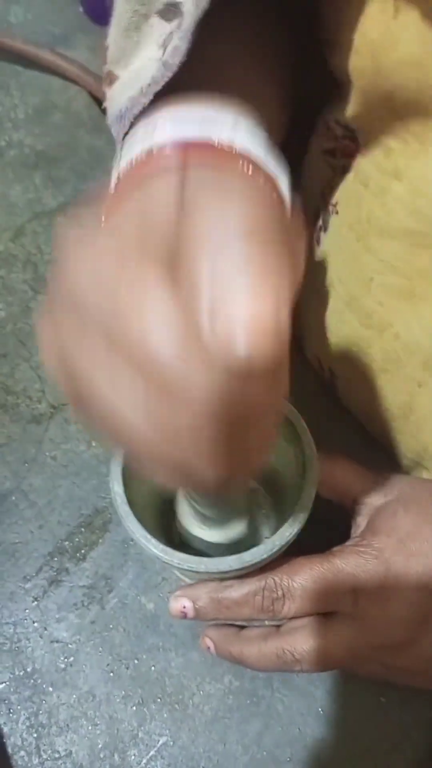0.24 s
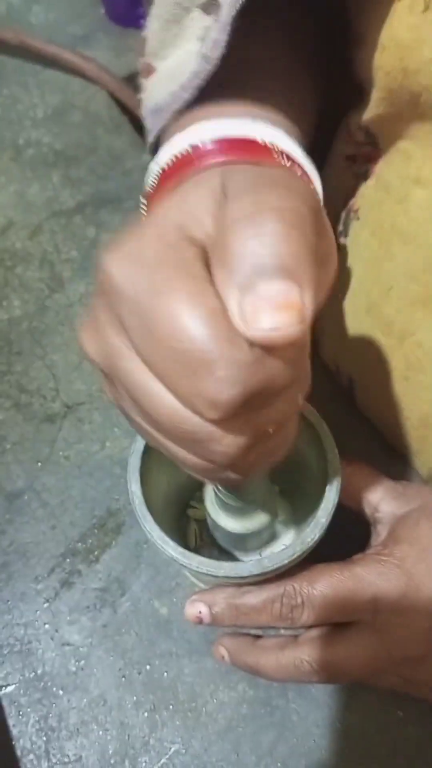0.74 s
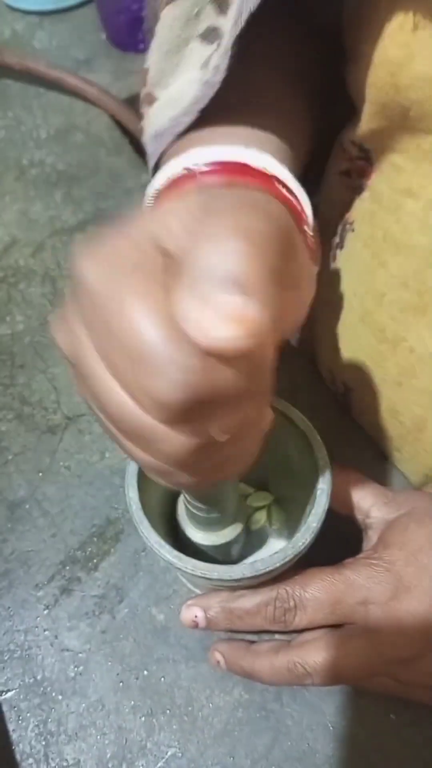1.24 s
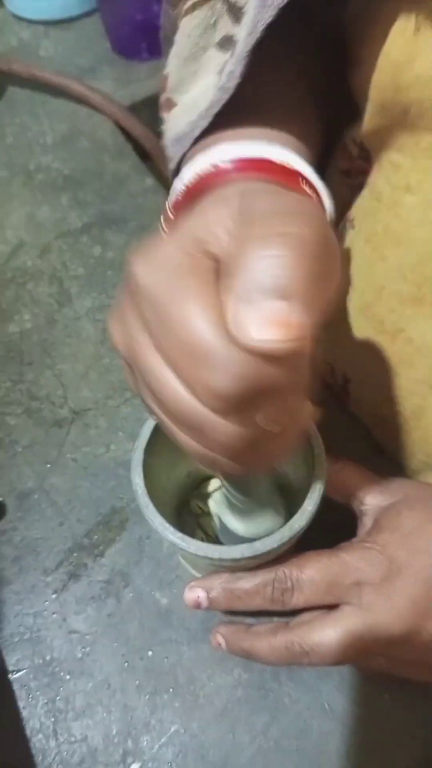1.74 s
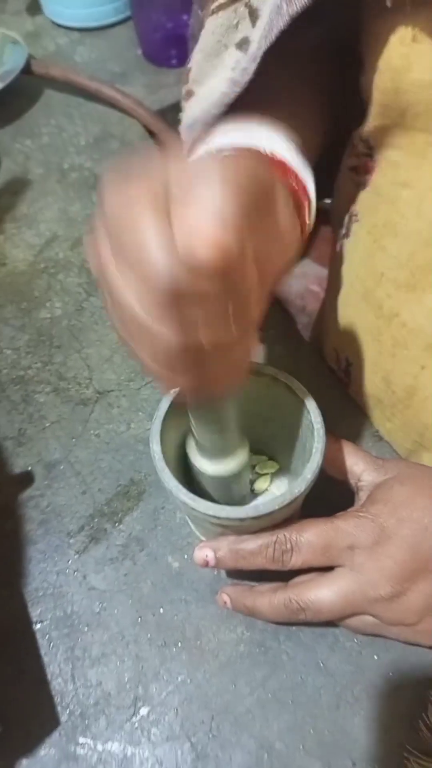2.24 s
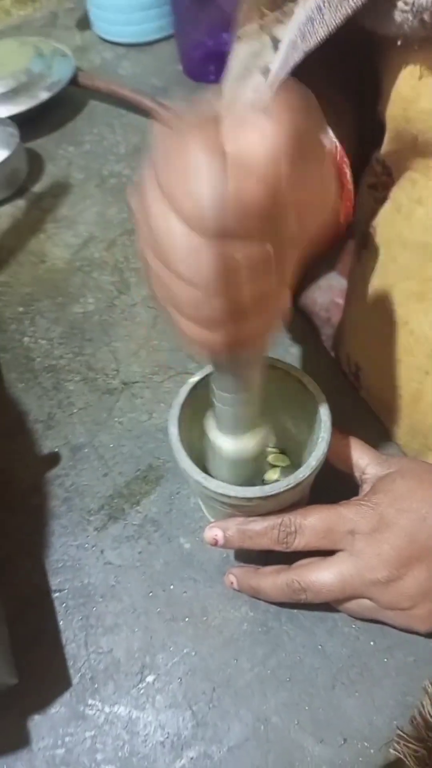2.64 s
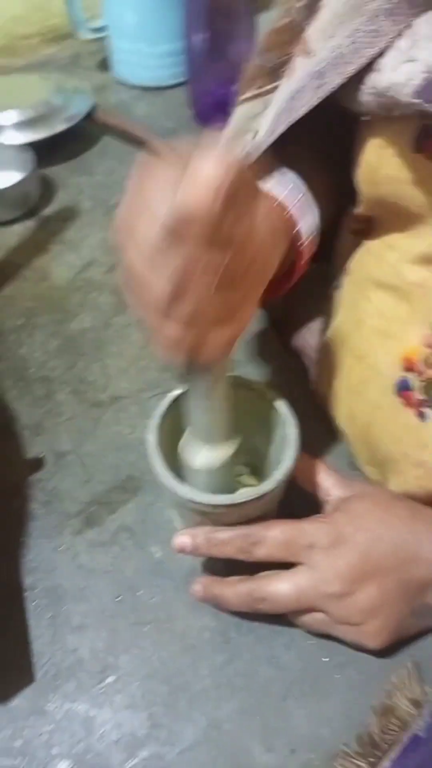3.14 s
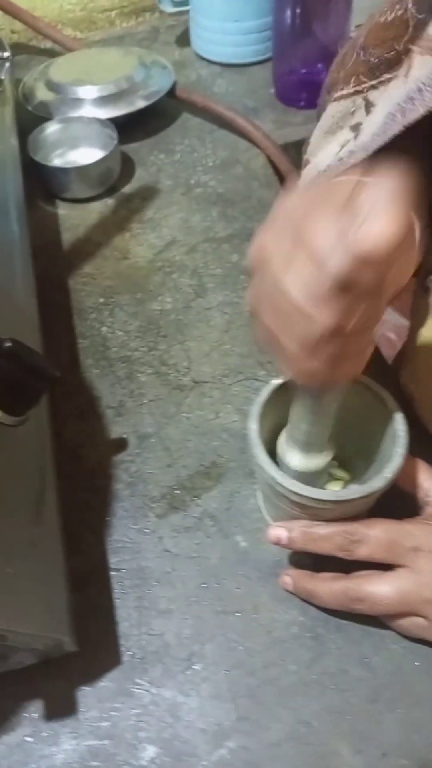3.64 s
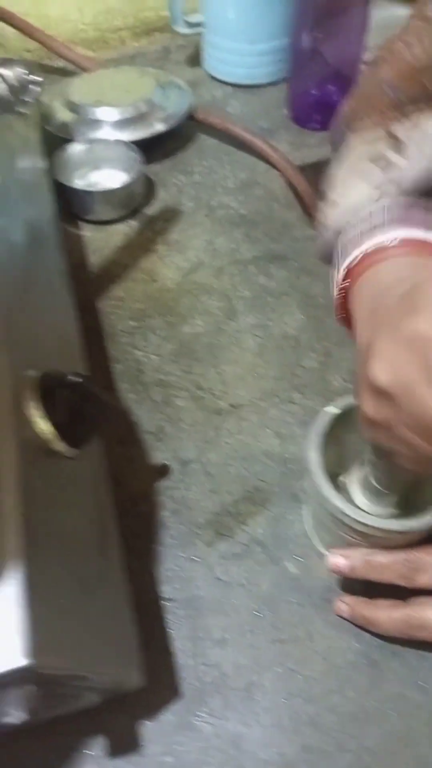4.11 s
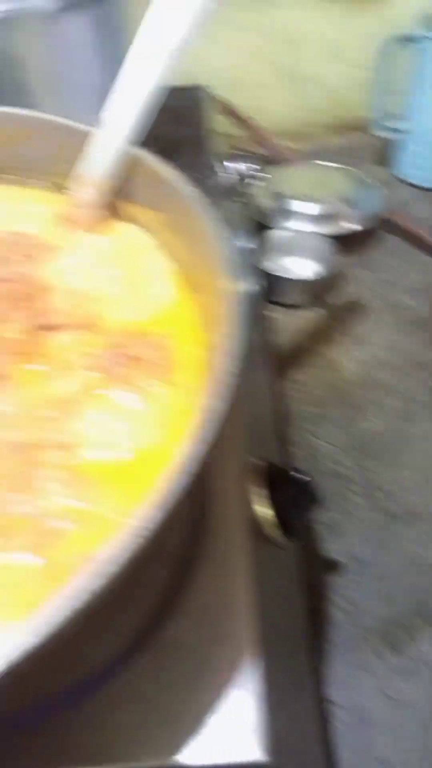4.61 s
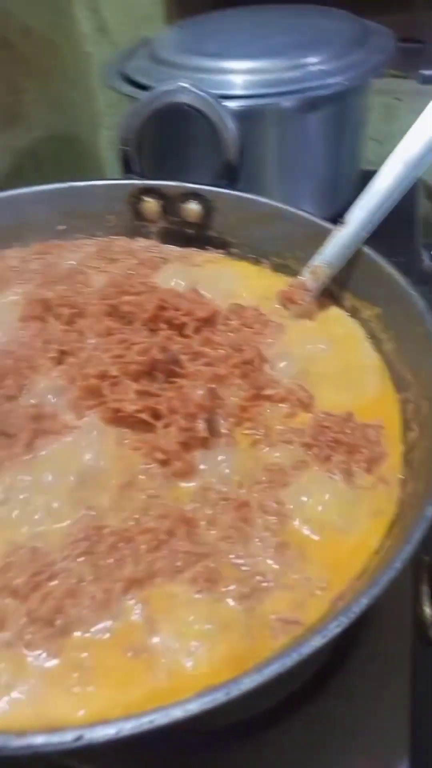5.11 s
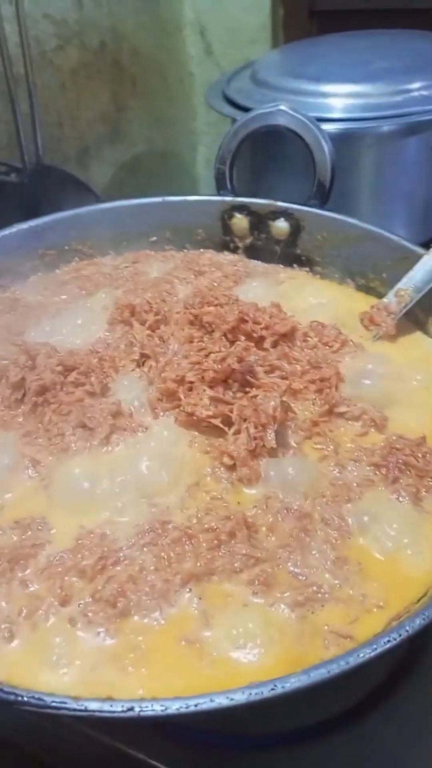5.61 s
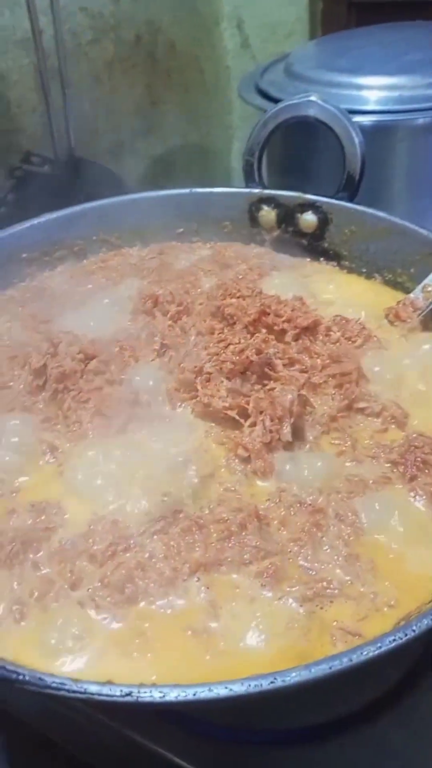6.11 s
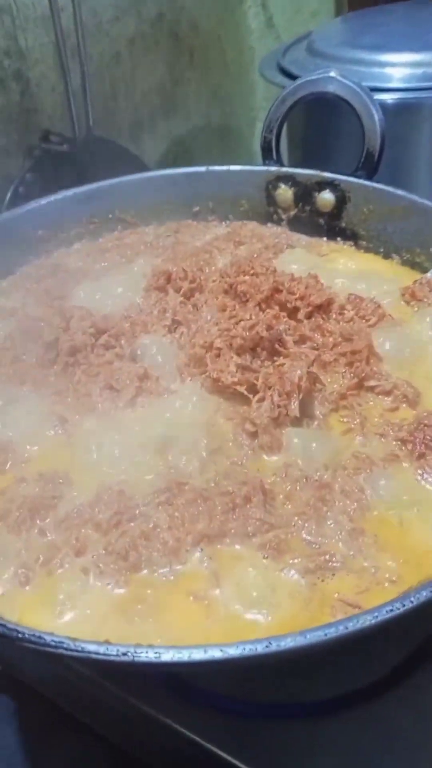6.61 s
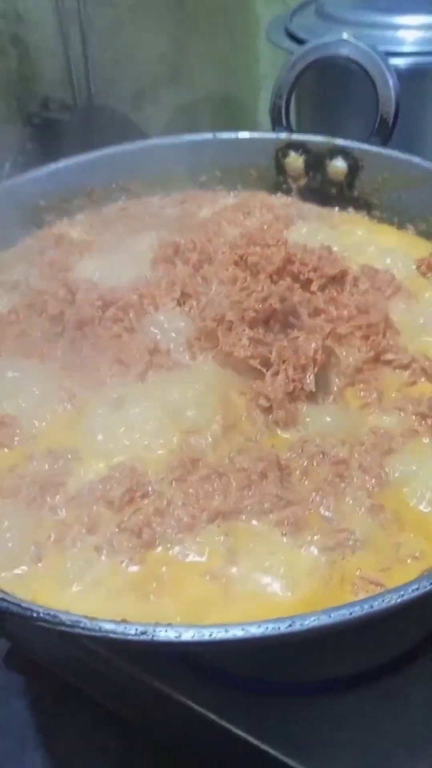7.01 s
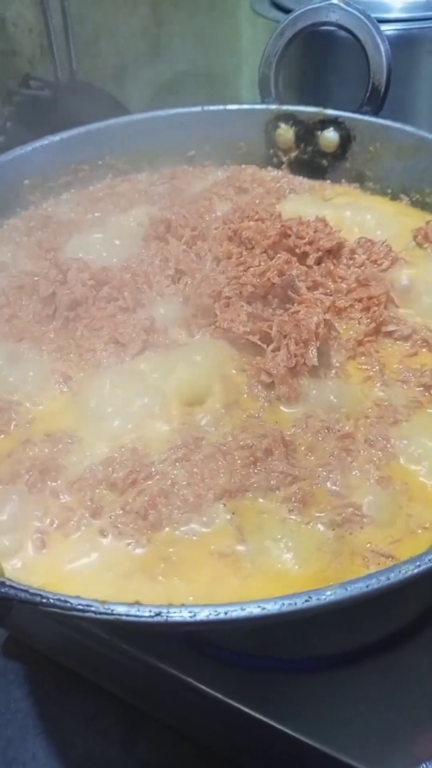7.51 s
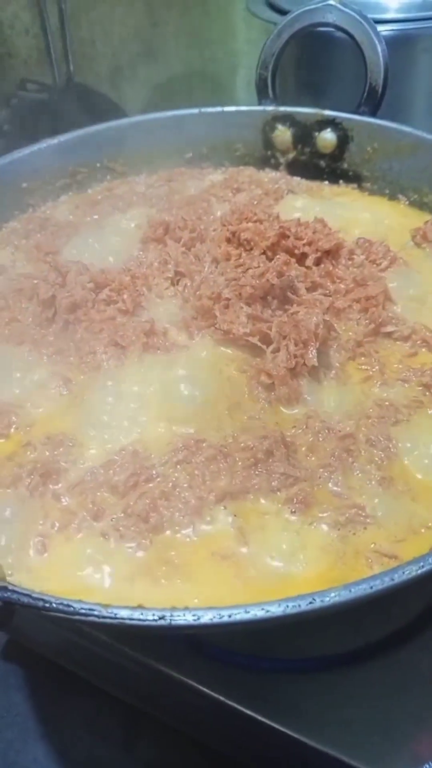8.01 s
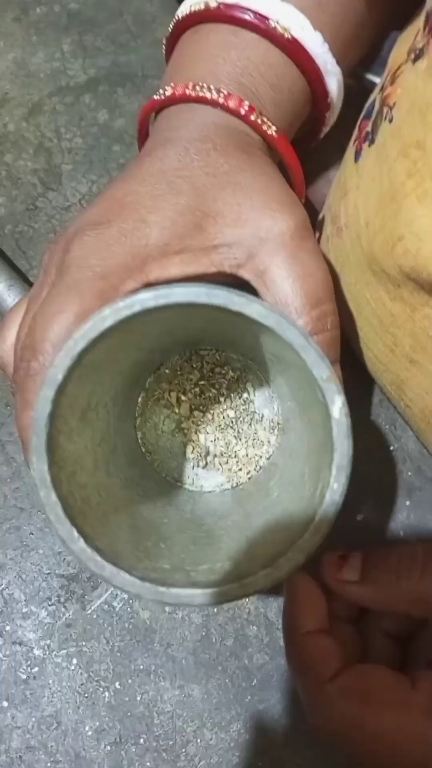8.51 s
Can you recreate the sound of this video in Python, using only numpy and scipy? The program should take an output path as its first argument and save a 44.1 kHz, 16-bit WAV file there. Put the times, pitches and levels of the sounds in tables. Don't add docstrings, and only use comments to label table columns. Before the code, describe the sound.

Steady sharp metallic pounding in a mortar on a stone counter, about four blows a second, with clinks, bangle ticks and faint hiss.

```python
import sys
import numpy as np
from scipy import signal
from scipy.io import wavfile
from scipy.ndimage import uniform_filter1d

SR = 44100
rng = np.random.default_rng(int(sys.argv[2]) if len(sys.argv) > 2 else 0)


def to_linear_factor(level_db):
    exponent = np.asarray(level_db, float) / 20
    return 10 ** exponent


def wrap_up_sound(samples):
    columns = np.atleast_2d(samples).T
    tamed = np.clip(columns, -1, 1)
    steps = np.round(tamed * 32767).astype(np.int16)
    wavfile.write(sys.argv[1], SR, steps)


N = 385875

# start in seconds, crack in dB, wall ring in dB, cup ring in dB.
BLOWS = [(0.0004, -21, -38, -27.5), (0.2649, -9.5, -26, -26), (0.5398, -13, -32.5, -26),
         (0.8032, -6.5, -23.5, -27.5), (1.063, -7.5, -22.5, -28.5), (1.3106, -12.5, -32, -27),
         (1.5684, -15, -40.5, -35.5), (1.8132, -12, -38, -28), (2.0627, -47.5, -72, -67),
         (2.3146, -9.5, -16.5, -28.5), (2.586, -6.5, -21.5, -33), (2.86, -6.5, -18, -38.5),
         (3.1308, -18.5, -62, -30.5), (3.4097, -7, -26.5, -33.5), (3.689, -8, -24, -36.5),
         (3.9619, -7.5, -25, -32), (4.2411, -8, -27.5, -31), (4.518, -21.5, -58, -29.5),
         (4.7912, -14.5, -49, -27.5), (5.0903, -8, -38.5, -28), (5.3842, -20.5, -41, -60),
         (5.6738, -8.5, -38.5, -31.5), (5.9649, -5.5, -32.5, -29), (6.2528, -3.5, -29, -34),
         (6.5346, -2.5, -32.5, -29), (6.8267, -0.5, -41, -21), (7.1035, -8.5, -56, -35),
         (7.5907, -13.5, -41, -23), (7.9542, -2, -21, -26.5), (8.318, -6, -30, -30.5)]
# pitch in Hz, gap between its two halves in Hz, time to fall 60 dB in seconds.
WALL_MODES = [(2773.5, 7.84, 0.31), (7245, 70, 0.27), (9880, 32, 0.15), (12000, 28, 0.11)]


def evened(x):
    return x / np.sqrt(np.mean(x ** 2) + 1e-20)


def read(points, hz):
    f, value = np.transpose(points)
    return np.interp(np.log(hz + 1), np.log(f + 1), value)


def add(mix, s, sound):
    part = mix[max(round(s * SR), 0):][:len(sound)]
    part += sound[:len(part)]


def coloured(x, points):
    gain_db = read(points, abs(np.fft.fftfreq(4096, 1 / SR)))
    log_gain = np.log(to_linear_factor(np.maximum(gain_db, -100)))
    spectrum = np.exp(np.conj(signal.hilbert(log_gain)))
    taps = np.fft.ifft(spectrum).real[:2048]
    return signal.oaconvolve(x, taps / np.linalg.norm(taps))[:len(x)]


def mode(hz, db, t60, rise_s, turn=0):
    t = np.arange(SR // 2) / SR
    return to_linear_factor(db - 60 * t / t60) * (1 - np.exp(-t / rise_s)) * np.sin(2 * np.pi * (hz * t + turn))


def pair(hz, split_hz, t60, db, luck):
    lower = mode(hz - split_hz / 2, db, t60, rise_s=0.00051)
    upper = mode(hz + split_hz / 2, db, t60, rise_s=0.00024, turn=luck[1])
    return lower + 0.53 * luck[0] * upper


def burst(db, t60, lead_s, grit_db):
    t = np.arange(4096) / SR - lead_s
    grain_db = grit_db * rng.standard_normal(4096 // 16).repeat(16)
    grit = rng.standard_normal(4096) * to_linear_factor(grain_db)
    return to_linear_factor(db + np.where(t < 0, 30 * t / lead_s - 14, -60 * t / t60)) * grit


def blows():
    # pitch in Hz, level in dB per Hz.
    crack_colour = [(290, -23.5), (500, 0.5), (2750, -0.5), (3220, -8.5), (4050, -11), (5680, -10),
                    (6570, -17.5), (8070, -34.5), (9000, -25.5), (11700, -50), (19800, -120)]
    # pitch in Hz, level in dB per Hz.
    husk_colour = [(3500, -16.5), (5300, 0.5), (7800, -4.5), (10300, -2), (12600, -17.5), (15300, -6),
                   (16300, -21.5)]
    # time in seconds, crunch in dB.
    pods = [(0, -49.5), (.8, -38.5), (1.55, -44.5), (2.5, -37), (3.7, -42), (4.55, -36.5), (5.4, -45.5),
            (6.5, -41), (6.85, -32.5), (7.1, -46.5), (7.6, -31.5), (8.3, -41)]
    # pitch in Hz, gap between its two halves in Hz, time to fall 60 dB in seconds.
    cup = (976, 22, 0.069)
    same_crack = .8
    crack, husk, ring = np.zeros((3, N))
    usual = burst(-6.0, 0.0075, lead_s=0.001698, grit_db=0.97)
    for (s, crack_db, wall_db, cup_db), luck in zip(BLOWS, rng.random((len(BLOWS), 5))):
        fresh = np.sqrt(1 - same_crack ** 2) * burst(-5.5, 0.0075, lead_s=0.0017, grit_db=1.3)
        add(crack, s - .001, to_linear_factor(crack_db) * (same_crack * usual + fresh))
        contact = mode(1900 + 700 * luck[4], crack_db - 16.5, 0.0052, rise_s=0.00015)
        add(crack, s + 0.001027, contact)
        husk_db = np.interp(s, *np.transpose(pods))
        add(husk, s - .003, burst(husk_db + 6.0, 0.017, lead_s=0.0032, grit_db=3.9))
        wall_ring = pair(*WALL_MODES[0], wall_db - .1, luck[:2])
        cup_ring = pair(*cup, cup_db + 6.5, luck[2:])
        add(ring, s + 0.001006, wall_ring + cup_ring)
    return coloured(crack, crack_colour) + coloured(husk, husk_colour), ring


def slab_boom():
    # pitch in Hz, level in dB, time to fall 60 dB in seconds.
    slab_modes = [(85.2, -9, 1.), (94.9, -16, 1.), (97.05, -7, 1.), (116, -11.5, 0.69), (163, -11, 0.45),
                  (194.3, -14, 1), (217.9, -3.5, 0.42), (225.5, -5.5, 0.74), (238.1, -5, 0.5),
                  (263.5, -11, 0.73), (299.7, 3.5, 0.34), (315.2, -5, 0.32), (325.4, -14.5, 0.99),
                  (344, 7.5, 0.12), (349.84, -0.5, 0.63), (359, -5.5, 0.43), (380.2, 3.5, 0.38),
                  (405.6, 1, 0.4), (414.8, -6, 0.34), (433.7, -4, 0.29), (458.7, -15, 0.76),
                  (493.4, -28, 0.9), (508.5, 2.5, 0.29), (518.7, -9.5, 0.49), (550.6, -3, 0.12),
                  (605, -27.5, 0.38), (637, -24, 0.28), (689, -13.5, 0.37)]
    # time in seconds, boom of a full crack in dB.
    weight = [(0, -26), (1.2, -27), (2.4, -28.5), (3.2, -26), (4.3, -26), (5.35, -27), (5.7, -24),
              (6.6, -27.5), (6.85, -33.5), (7.3, -23), (8.4, -26)]
    # time in seconds, middle boom in dB, upper boom in dB.
    stance = [(0, -0.5, 0), (1.5, 0, 0.5), (2.3, -1.5, -1.5), (3.5, 1.5, -4.5), (4.2, 1, -3),
              (4.6, -4.5, 0.5), (5.7, -2, 2.5), (6.4, 0.5, 0), (6.85, -2, 7), (7.1, 2.5, 1.5),
              (7.6, -0.5, 1.5), (8.4, 0.5, 2.5)]
    deep_hz, middle_hz, upper_hz = 130, 335, 470
    boom_per_crack = 0.29
    deep_per_crack, deep_db = 0.16, -1
    modes = np.array([(-1) ** k * mode(*row, rise_s=0.0046) for k, row in enumerate(slab_modes)])
    modes /= abs(modes.sum(0)).max()
    group = np.digitize(np.array(slab_modes)[:, 0], [deep_hz, middle_hz, upper_hz])
    deep, low, middle, upper = (modes[group == k].sum(0) for k in range(4))
    stance_s, middle_db, upper_db = np.transpose(stance)
    boom = np.zeros(N)
    for s, crack_db, _, _ in BLOWS:
        boom_db = np.interp(s, *np.transpose(weight)) + 8
        slab = low + to_linear_factor(np.interp(s, stance_s, middle_db)) * middle
        slab = slab + to_linear_factor(np.interp(s, stance_s, upper_db)) * upper
        add(boom, s, to_linear_factor(boom_db + boom_per_crack * crack_db) * slab)
        add(boom, s, to_linear_factor(boom_db + deep_db + deep_per_crack * crack_db) * deep)
    return boom


def rattle(clank):
    # start in seconds, length in seconds, level in dB.
    rocking = (6.835, .095, -30)
    start_s, length_s, db = rocking
    rock = np.arange(0, length_s, 1 / SR) / length_s
    knocks = evened(rng.standard_normal(SR // 4) ** 3)[:len(rock)]
    add(clank, start_s, to_linear_factor(db) * np.sin(np.pi * rock ** 1.2) * knocks)


def clinks():
    # start in seconds, tick in dB, then ring of the first, second and third wall tones in dB.
    wall_taps = [(0.2445, -22.5, -37.5, -64, -53), (0.622, -22.5, -68, -76, -80),
                 (1.5359, -9.5, -14, -55.5, -42), (1.701, -14, -26, -57, -40.5),
                 (2.2991, -13, -20.5, -44, -34.5), (2.588, -41.5, -28.5, -48.5, -41.5),
                 (5.3664, -24, -45, -56.5, -64), (6.6296, -26.5, -42.5, -52, -63.5),
                 (6.8238, -13, -28.5, -35.5, -45), (6.8423, -13.5, -32.5, -39, -48),
                 (6.861, -23.5, -38.5, -44, -56.5), (6.8844, -20.5, -27, -41, -53),
                 (7.4151, -14, -26, -43, -45.5), (7.4355, -37, -32.5, -40, -54.5)]
    # pitch in Hz, level in dB per Hz.
    clank_colour = [(500, -13.5), (1500, -2.5), (3200, 5.5), (4200, -10), (5200, -4.5), (9000, -32),
                    (15000, -30)]
    # pitch in Hz, level in dB, time to fall 60 dB in seconds.
    overtone = (12000, -9, .12)
    over_hz, over_db, over_t60 = overtone
    clank, ring = np.zeros((2, N))
    for (s, tick_db, *ring_db), luck in zip(wall_taps, rng.random((len(wall_taps), 4, 2))):
        ring_db.append(ring_db[-1] - 8)
        add(clank, s - .001, burst(tick_db - 5, 0.0065, lead_s=0.00089, grit_db=2.8))
        for wall_mode, db, share in zip(WALL_MODES, ring_db, luck):
            add(ring, s, pair(*wall_mode, db + 2.0, share))
        add(ring, s, mode(over_hz, over_db + ring_db[3], over_t60, rise_s=.0006))
    rattle(clank)
    return coloured(clank, clank_colour), ring


def scrapes(width_hz):
    # start in seconds, level in dB, pitch in Hz.
    drags = [(0.2109, -46.5, 1454), (0.659, -41.5, 2360), (1.457, -54.5, 2260), (1.789, -37, 2720),
             (1.965, -38.5, 2100), (2.1535, -50.5, 1700), (2.493, -40.5, 2760), (2.7794, -51, 2760),
             (3.097, -58.5, 2770), (3.322, -61, 1350), (3.3583, -51, 1480), (4.13, -46, 2040),
             (4.463, -43, 1610), (5.0295, -53.5, 3130), (5.545, -51, 2160), (5.865, -48, 1940),
             (6.17, -45, 3150)]
    length_s = .05
    out = np.zeros(N)
    t = np.arange(8192) / SR
    swell = np.sin(np.pi * np.minimum(t / length_s, 1))
    for (s, db, hz), slips in zip(drags, rng.standard_normal((len(drags), 8192))):
        rub = evened(signal.lfilter(*signal.iirpeak(hz, hz / width_hz, SR), slips ** 3))
        add(out, s, to_linear_factor(db - 14) * rub * swell)
    return out


def bangles():
    # start in seconds, level in dB, brightness in dB.
    touches = [(0.1226, -56, -25), (0.4673, -39, -13.5), (1.2048, -34.5, -40), (1.3912, -44.5, -39),
               (1.9914, -73, -25), (2.4638, -46, -28), (4.375, -57.5, -23), (4.5446, -34.5, -6),
               (4.9082, -43.5, -6.5), (4.999, -47, -14), (5.0716, -44, -13), (5.2084, -41, -21.5),
               (5.314, -44.5, -10.5), (5.426, -45, -15), (6.494, -52.5, 12), (7.8002, -43, -11),
               (8.1549, -36, -2.5), (8.516, -45, -16)]
    # pitch in Hz, level in dB, time to fall 60 dB in seconds.
    bangle_modes = [(6400, -4, 0.035), (10000, 3, 0.033), (10700, -5.5, 0.025), (14400, -10.5, 0.03),
                    (15450, -5.5, .03)]
    out = np.zeros(N)
    draws = rng.standard_normal((len(touches), len(bangle_modes), 2))
    for (s, db, bright_db), luck in zip(touches, draws):
        for (hz, mode_db, t60), (detune, share) in zip(bangle_modes, luck):
            level_db = db + mode_db + 3 * share - 17.5
            if hz > 12500:
                level_db += bright_db
            add(out, s, mode(hz * (1 + 0.013 * detune), level_db, t60, rise_s=0.00034))
        snap = burst(db + 0.38 * bright_db - 6.5, 0.0044, lead_s=0.0023, grit_db=6.0)
        add(out, s - .001, np.diff(snap, n=2))
    return out


def kitchen(x):
    # pitch in Hz, time to fall 60 dB in seconds.
    echo_t60 = [(300, 0.69), (1100, 0.3), (2900, 0.28), (7700, 0.25), (15000, 0.12)]
    # pitch in Hz, level in dB.
    echo_colour = [(300, 4.5), (1000, 0), (3000, -1), (8000, -4.5), (15000, 6)]
    alike = .75
    hz, t, z = signal.stft(rng.standard_normal((4, SR // 2)), SR, nperseg=256)
    z *= to_linear_factor(read(echo_colour, hz)[:, None] - 60 * t / read(echo_t60, hz)[:, None])
    tails = signal.istft(z, SR, nperseg=256)[1][:, :SR // 2]
    tails = np.sqrt(alike / 2) * tails[3] + np.sqrt(1 - alike) * tails[:3]
    tails *= np.clip(np.arange(SR // 2) / SR / 0.0016 - .6, 0, 1)
    turns = 2 * np.pi * (np.arange(N) / SR * 1.19 + np.arange(3)[:, None] / 3)
    feeds = x * (1 + np.cos(turns)) * np.sqrt(2 / 9)
    return signal.fftconvolve(feeds, tails / np.linalg.norm(tails[0]), axes=1).sum(0)[:N]


def hiss(patchy_db):
    # pitch in Hz, level in dB per Hz.
    hiss_colour = [(30, -28.5), (90, -6), (400, -5), (900, -13), (3200, -13), (3900, -22.5), (5500, -27.5),
                   (16000, -39.5)]
    frames, hz = N // 128 + 5, np.fft.rfftfreq(512, 1 / SR)
    a, b, patches = rng.standard_normal((frames, 257, 3)).T
    patches = uniform_filter1d(uniform_filter1d(patches, 7, 0), 14, 1)
    z = (a + 1j * b) * to_linear_factor(read(hiss_colour, hz)[:, None] + patchy_db * evened(patches))
    noise = signal.istft(z, nperseg=512, noverlap=384)[1][:N]
    return to_linear_factor(-67.5) * evened(noise)


def scene():
    snaps, blow_ring = blows()
    clank, clink_ring = clinks()
    snaps = snaps + bangles()
    ring = blow_ring + clink_ring
    wet = kitchen(to_linear_factor(-1.5) * snaps + to_linear_factor(-7.5) * clank + to_linear_factor(-10.0) * ring)
    return (snaps + clank + ring + wet + slab_boom() + scrapes(width_hz=140))[None]


def closing(x, floor_db, hold_s, fall_s):
    power_db = 10 * np.log10(abs(uniform_filter1d(x ** 2, 400)) + 1e-9)
    sudden = (power_db - np.roll(power_db, 700) > 11) & (power_db > floor_db)
    last_rise = np.maximum.accumulate(np.arange(N) * sudden)
    since_s = (np.arange(N) - last_rise) / SR
    return uniform_filter1d(np.clip((since_s - hold_s) / fall_s, 0, 1), 200)


def band_limit(x):
    return signal.sosfilt(signal.butter(12, 17010, fs=SR, output="sos"), x)


def record(dry):
    gate_db = -47
    edge_hz, edge_db = 15900, -15.5
    end_s = 8.603
    bass = signal.oaconvolve(dry[0], signal.firwin(1001, 600, fs=SR), "same")
    treble = dry[0] - bass
    bass_gain = to_linear_factor(-14 * closing(bass, gate_db, hold_s=.13, fall_s=0.082))
    treble_gain = to_linear_factor(-4 * closing(treble, gate_db, hold_s=0.11, fall_s=.1))
    gated = bass * bass_gain + treble * treble_gain + hiss(patchy_db=4.5)
    gated = signal.sosfilt(signal.butter(3, 60, "high", fs=SR, output="sos"), gated)
    low = signal.oaconvolve(gated, signal.firwin(301, edge_hz, fs=SR), "same")
    gated = low + to_linear_factor(edge_db) * (gated - low)
    stop = np.clip((end_s + 0.0153 - np.arange(N) / SR) / 0.0087, 0, 1) ** 2
    return band_limit((gated * stop)[None])


dry = scene()
out = record(dry)
wrap_up_sound(out)
```